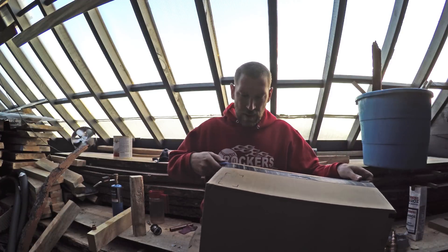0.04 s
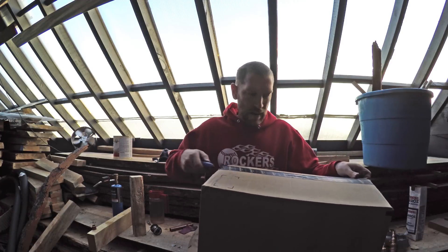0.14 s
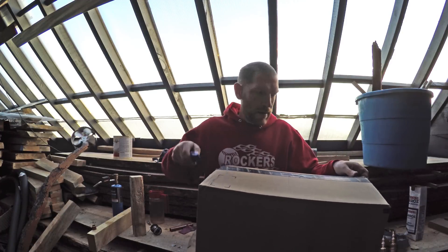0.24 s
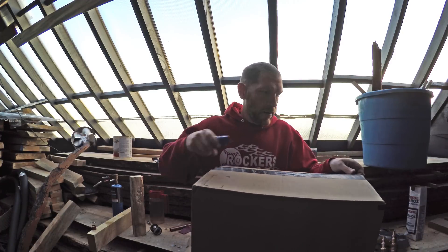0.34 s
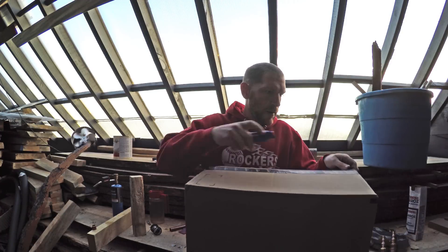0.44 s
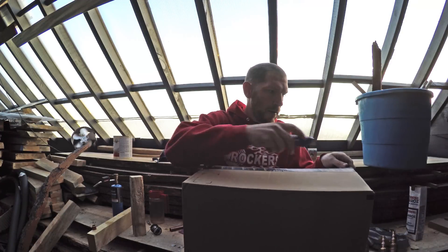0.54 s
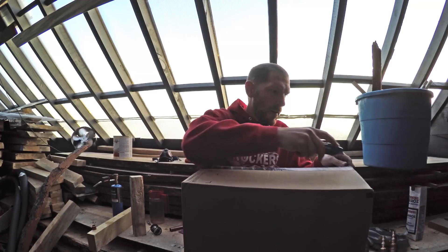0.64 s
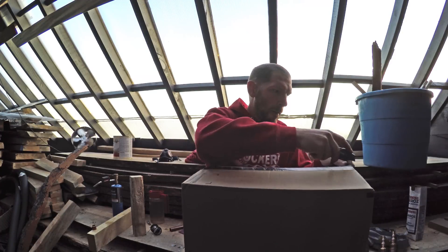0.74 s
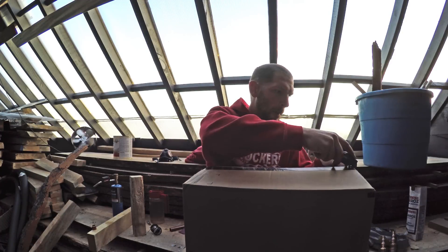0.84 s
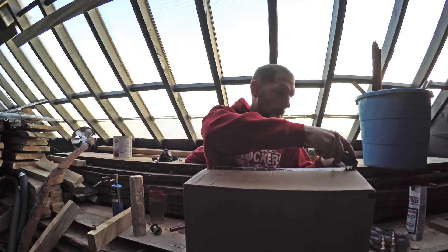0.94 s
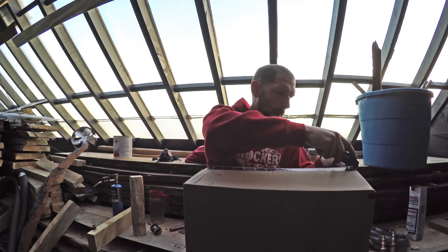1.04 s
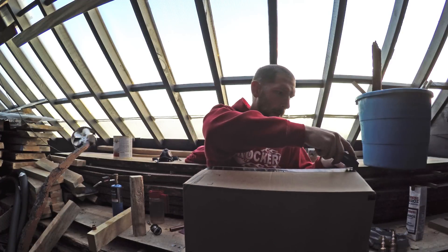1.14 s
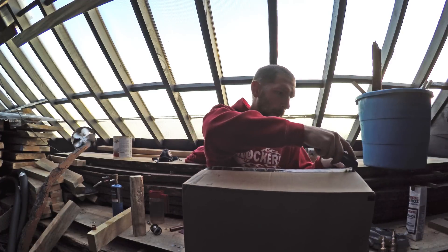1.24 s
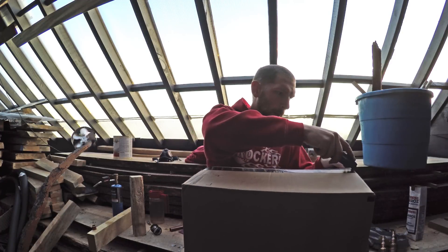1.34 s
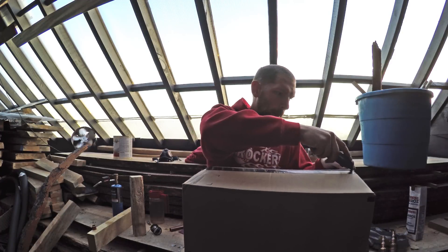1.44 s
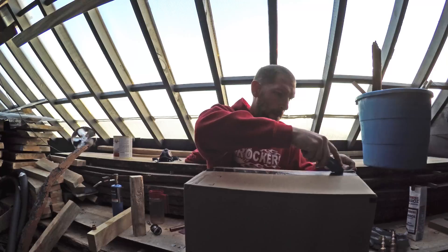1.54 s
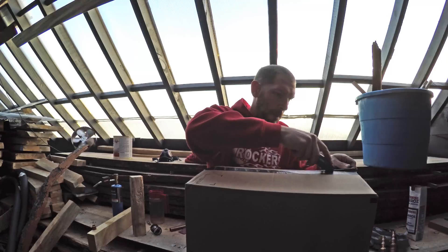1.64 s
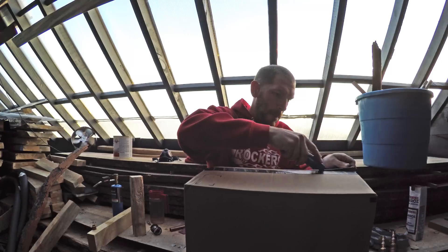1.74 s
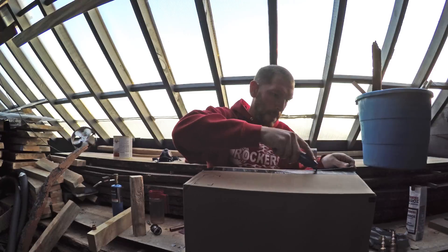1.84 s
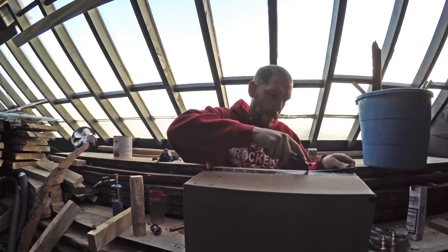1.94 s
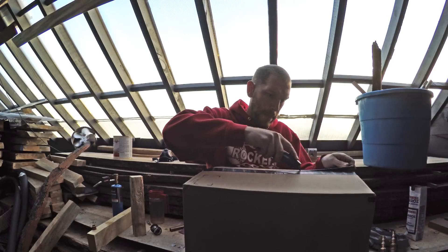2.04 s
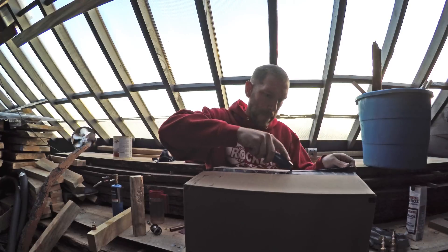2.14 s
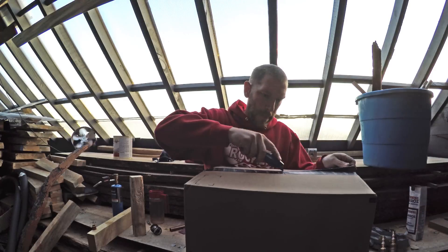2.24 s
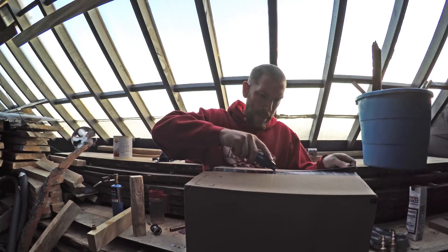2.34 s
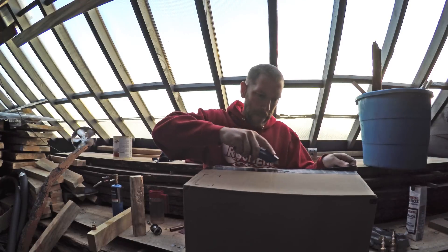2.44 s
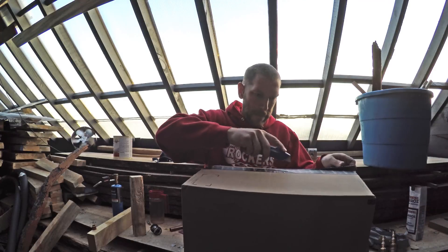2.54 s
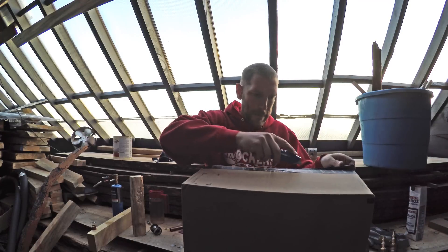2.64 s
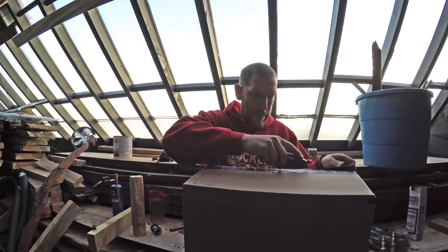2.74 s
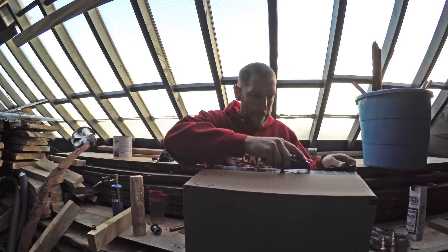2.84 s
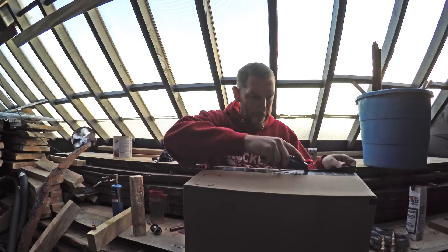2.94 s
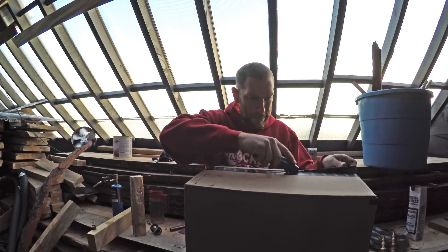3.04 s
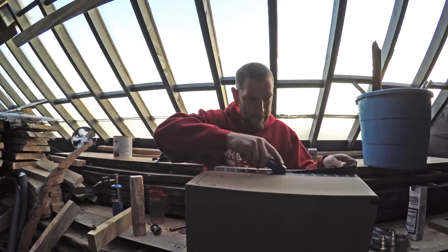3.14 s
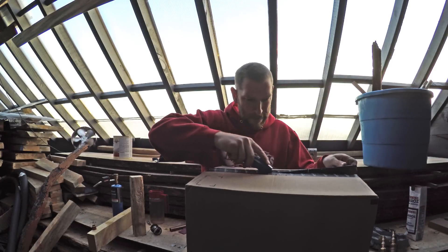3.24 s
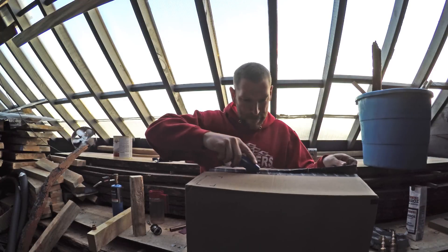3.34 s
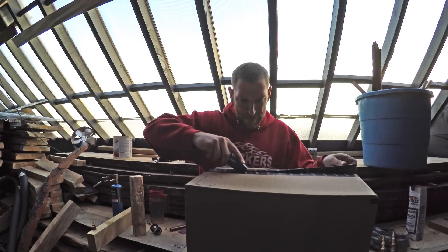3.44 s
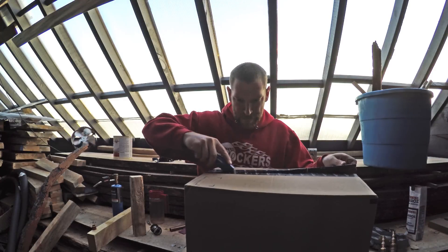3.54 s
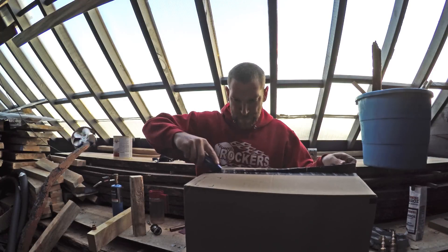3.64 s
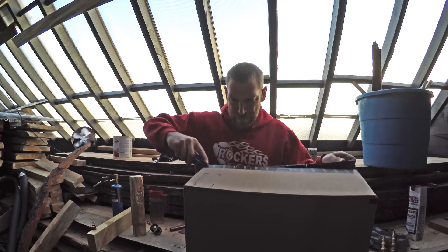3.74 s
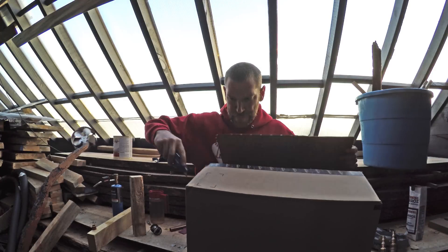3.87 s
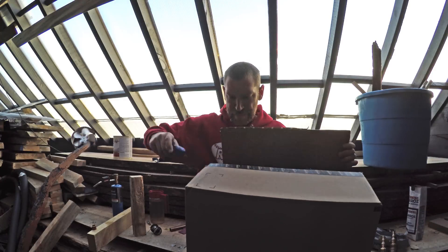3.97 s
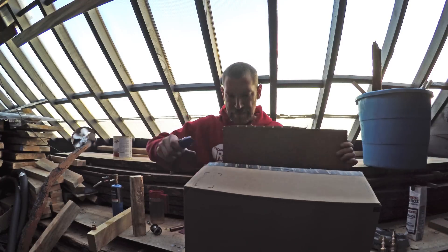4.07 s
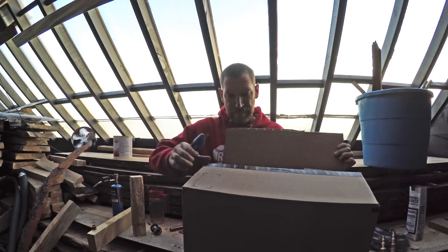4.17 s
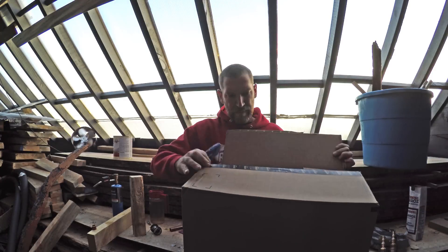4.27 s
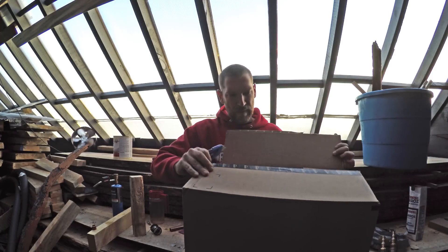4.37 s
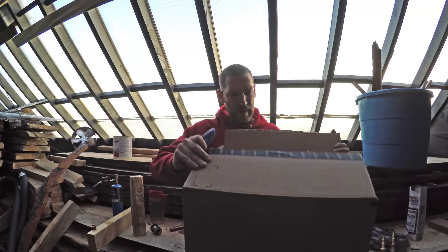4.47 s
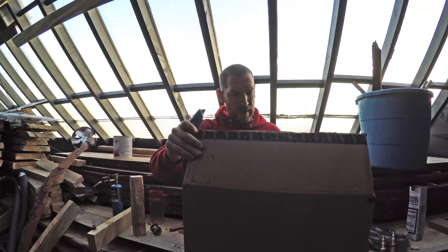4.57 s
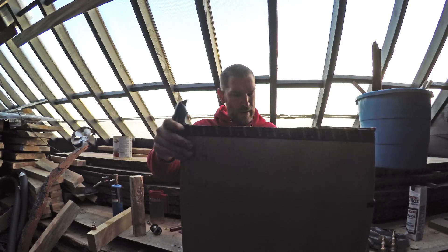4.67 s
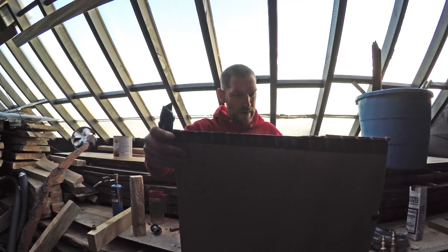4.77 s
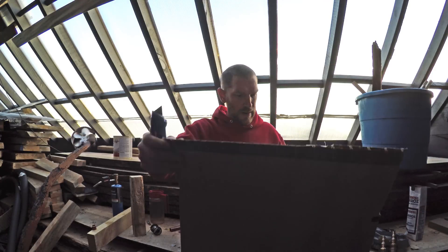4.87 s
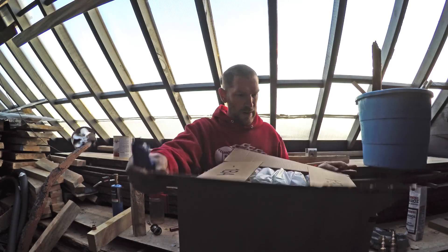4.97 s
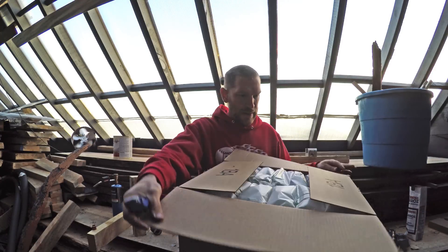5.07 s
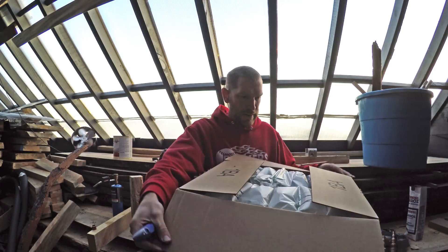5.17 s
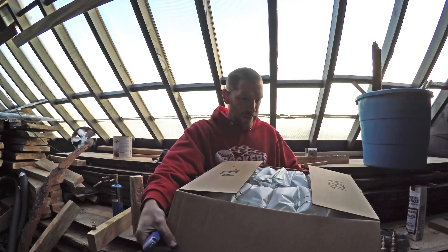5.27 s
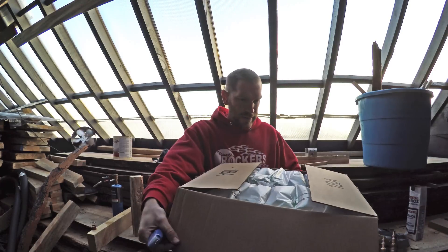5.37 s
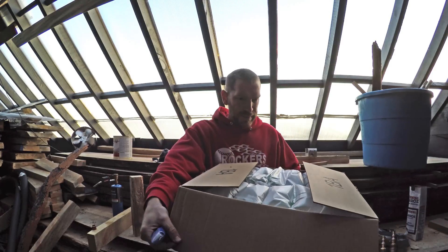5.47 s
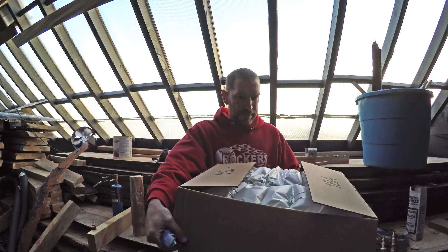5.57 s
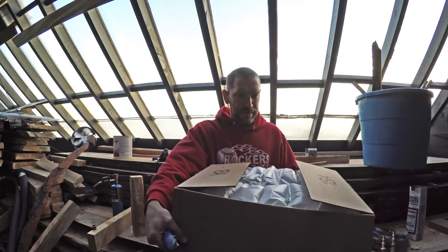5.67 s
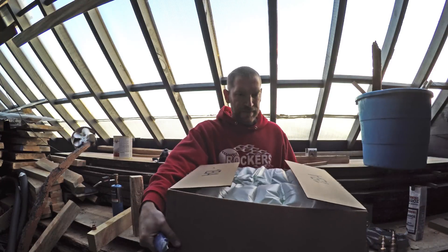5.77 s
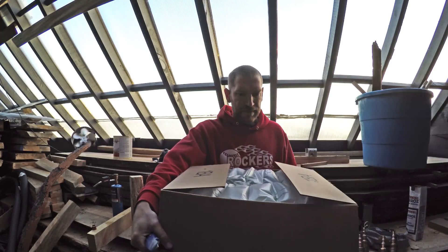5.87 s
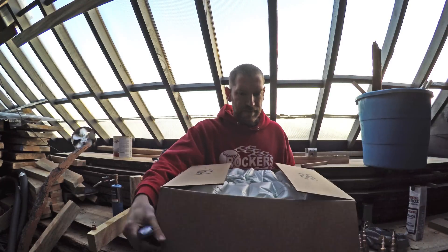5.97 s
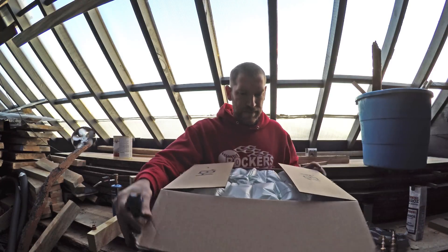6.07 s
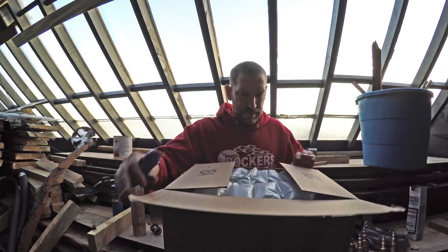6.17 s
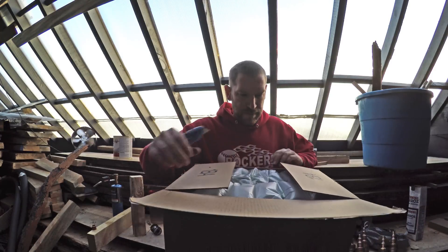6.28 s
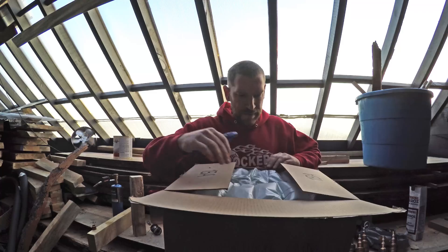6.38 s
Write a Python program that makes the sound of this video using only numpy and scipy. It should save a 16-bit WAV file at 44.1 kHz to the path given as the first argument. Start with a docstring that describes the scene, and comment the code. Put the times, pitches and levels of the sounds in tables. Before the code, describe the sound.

Two hollow bumps and a scuff on a cardboard box open the scene, followed by light metallic ticks from a utility knife between 0.9 and 1.4 seconds. At 1.5 seconds the blade pops through the packing tape with a sharp crack and thump, the loudest moment, and starts a rasping cut. From about 1.9 to 2.4 seconds it stutters rapidly over ridges in the card while the box drums and the bench booms beneath. The knife clicks at 2.5 seconds. Two more hissing, crackling cuts with hollow knocks run from 3 to 3.9 seconds. From 4.2 seconds the flaps are pulled open in three softer rubbing movements, with dull knocks, low puffs of air and a few knife ticks, fading around 6.3 seconds. Everything sounds close, with a very short shed echo and a faint, steady low rumble.

```python
"""A knife opens a taped cardboard box in an airy shed, over a low rumble. First hands bump and scuff
the hollow box, and loose steel parts of the knife tick. At 1.5 s the blade pops through the tape and cuts:
the box drums, the bench under it booms, the card rasps and hisses. Around 2 s the blade stutters over the
ridges inside the card, and from 3 s it makes two more cuts. From 4.2 s the flaps are pulled open,
pushing air and rubbing until they fall quiet at about 6.3 s."""
import sys
import numpy as np
from scipy import signal
from scipy.fft import rfft, irfft, next_fast_len
from scipy.io import wavfile
from scipy.ndimage import uniform_filter1d, map_coordinates

SR = 44100
rng = np.random.default_rng(int(sys.argv[2]) if len(sys.argv) > 2 else 0)


def generate_wav(signal):
    """Clip the signal to [-1, 1] and save it as 16-bit WAV at the path in sys.argv[1]."""
    frames = np.transpose(np.atleast_2d(signal))
    scaled = np.clip(frames, -1, 1) * 32767
    pcm = np.round(scaled).astype(np.int16)
    wavfile.write(sys.argv[1], SR, pcm)


N = 282681


def amp(db):
    """Turn decibels into a multiplier."""
    return 10 ** (np.asarray(db) / 20)


def unit(x):
    """Scale x to an average (rms) strength of 1."""
    return x / np.sqrt(np.mean(x ** 2) + 1e-20)


def along(points, hz):
    """Read between (pitch, value) points on a musical (log) scale."""
    pitches, values = np.transpose(points)
    return np.interp(np.log(hz + 1), np.log(pitches + 1), values)


def wobble(rate):
    """A smooth curve through `rate` random values a second."""
    return map_coordinates(rng.standard_normal(int(N * rate / SR) + 4), [np.arange(N) * rate / SR])


def drift(tones, t):
    """A random wander for each tone, to make it unsteady."""
    return np.cumsum(rng.standard_normal((len(tones), len(t))), axis=1)


def filtered(x, response):
    """Turn each frequency of x up or down by response(hz)."""
    size = next_fast_len(len(x) + SR // 2)
    return irfft(rfft(x, size) * response(np.fft.rfftfreq(size, 1 / SR)), size)[:len(x)]


def resonant(tones):
    """The response of an object that favours some (pitch, width, level) tones."""
    return lambda hz: sum((-1) ** k * amp(db) * 1j * hz * width / (pitch ** 2 - hz ** 2 + 1j * hz * width)
                          for k, (pitch, width, db) in enumerate(tones))


def add(track, start, sound):
    """Mix a sound in at `start` seconds."""
    part = track[max(round(start * SR), 0):][:len(sound)]
    part += sound[:len(part)]


# The background noise: (pitch [Hz], relative level [dB])
AIR_COLOUR = [(25, -2.5), (50, -3.5), (75, -7), (109, -1.5), (166, -20.5), (400, -25.5), (1400, -36.5),
              (2400, -45.5), (15600, -57.5)]
def air():
    """Far rumble and faint hiss, there all the time."""
    return amp(-39) * unit(filtered(rng.standard_normal(N), lambda hz: amp(along(AIR_COLOUR, hz))))


# Four knife cuts, then three flap pulls, each a list of (time [s], box drum [dB], surface hiss [dB])
STROKES = [
    [(1.537, -32, -20), (1.558, -21.5, -34), (1.61, -73, -38), (1.65, -42, -43), (1.7, -32, -39.5),
     (1.8, -40.5, -40.5), (1.85, -38, -53.5), (1.93, -58, -57)],
    [(1.912, -30, -48), (1.928, -31.5, -38), (2.0, -30, -37), (2.1, -35.5, -35), (2.2, -30.5, -35),
     (2.33, -25.5, -37), (2.4, -30, -40.5), (2.46, -41, -50)],
    [(3.02, -37, -51), (3.08, -31, -34), (3.15, -34.5, -41.5), (3.2, -26.5, -36.5), (3.3, -45.5, -39),
     (3.38, -35.5, -43.5), (3.5, -33.5, -40), (3.67, -40, -42)],
    [(3.63, -42, -60), (3.68, -40, -37), (3.72, -30, -35.5), (3.79, -25, -33), (3.86, -28.5, -41.5),
     (3.91, -49, -44), (3.96, -76, -65), (4.2, -67, -64)],
    [(4.3, -68, -73), (4.36, -32.5, -56), (4.45, -42, -51.5), (4.53, -53, -57.5), (4.56, -35, -59),
     (4.62, -42.5, -54), (4.7, -48, -48.5), (4.73, -47, -56.5), (4.85, -55, -56.5)],
    [(4.86, -40, -71), (4.925, -39.5, -48.5), (4.96, -38.5, -46.5), (5.02, -39.5, -54), (5.1, -45.5, -54.5),
     (5.22, -51, -55), (5.24, -54, -62)],
    [(5.23, -45, -49), (5.27, -38, -51), (5.33, -49, -46), (5.39, -32, -41), (5.45, -47.5, -49.5),
     (5.6, -44.5, -47.5), (5.66, -41.5, -46), (5.74, -47.5, -53), (5.85, -53, -49), (6.1, -44, -48),
     (6.2, -42.5, -53), (6.28, -60, -65), (6.4, -69, -95)],
]
# One row a stroke: (rasp over the mean of drum and hiss [dB], rasp growth [dB/s], boom over drum [dB],
# shine over hiss [dB], low blade tone over hiss [dB], high blade tone over hiss [dB])
STROKE_COLOURS = [(-3.5, 2, -3, -10.5, -28, -14.5), (-4.5, 14.5, -4, -52, -57, -25),
                  (-3.5, -4.5, -20, -5, -35, -20), (4.5, -41, -13, -9.5, -32, -39),
                  (-3, 2.5, -20, -6, -40, -40), (-5, 17, -12, -8.5, -40, -40),
                  (0, -1.5, -10.5, -7, -40, -40)]
# Short scuffs of hand or blade: (time [s], hold [s], drum [dB], rasp [dB], hiss [dB])
SHORT_SCUFFS = [(0.0, 0.0063, -21, -36, -44.5), (0.034, 0.034, -26, -39, -43.5),
                (0.157, 0.013, -36.5, -43, -47.5), (0.482, 0.035, -58, -61, -61),
                (0.899, .004, -51, -44.5, -68), (2.46, 0.017, -39, -50, -54), (2.866, 0.028, -40, -71, -50),
                (2.96, 0.055, -43, -64, -49), (4.192, 0.016, -27, -44, -46), (4.225, 0.015, -45, -69, -47),
                (4.556, 0.018, -61, -56, -48.5)]
# A faint rustle that never stops: (drum [dB], rasp [dB], hiss [dB], shine [dB])
RUSTLE_DB = (-67, -69.5, -66.5, -74)
def contact():
    """How hard rubbing drives drum, rasp, hiss, shine (top treble), two blade tones and boom."""
    now, gains = np.arange(N) / SR, np.zeros((7, N))
    for stroke, (rasp_over, growth, boom_over, *treble_over) in zip(STROKES, STROKE_COLOURS):
        times, *curves = np.transpose(stroke)
        on = (now > times[0]) & (now < times[-1])
        age = now[on] - times[0]
        drum_db, hiss_db = [np.interp(now[on], times, curve) for curve in curves]
        rasp_db = (drum_db + hiss_db) / 2 + rasp_over + growth * age
        treble_db = [hiss_db + db for db in treble_over]
        fade = np.clip(np.minimum(age, times[-1] - now[on]) / 0.015, 0, 1)
        gains[:, on] += fade * amp([drum_db, rasp_db, hiss_db, *treble_db, drum_db + boom_over])
    rise_s, fade_db_per_s = 0.012, 410
    for start, hold, drum_db, rasp_db, hiss_db in SHORT_SCUFFS:
        rise = np.clip((now - start) / rise_s, 0, 1)
        fade = amp(-fade_db_per_s * np.maximum(now - start - rise_s - hold, 0))
        gains[:4] += amp([[drum_db], [rasp_db], [hiss_db], [hiss_db - 7.5]]) * rise * fade
    gains[:4] += amp(RUSTLE_DB)[:, None]
    # the low blade tone swells as the blade sticks in the slit
    gains[4] += amp(-41.5) * np.exp(-((now - 3.297) / 0.081) ** 2)
    return gains


def grit(rate_hz, spread_db):
    """Friction: noise whose strength jumps from fibre to fibre."""
    return rng.standard_normal(N) * amp(spread_db * wobble(rate_hz))


def patchy(x, depth_db):
    """The contact shifts, so small patches of time and pitch swell and fade."""
    spectrum = signal.stft(x, nperseg=256)[2]
    patches = uniform_filter1d(rng.standard_normal(spectrum.shape), size=4, axis=0)
    patches = uniform_filter1d(patches, size=8, axis=1)
    return signal.istft(spectrum * amp(depth_db * unit(patches)), nperseg=256)[1][:N]


def treble(hz):
    """A weight that climbs from 0 at 4 kHz to 1 at 16 kHz."""
    return np.clip(np.log2(hz / 4000 + 1e-9) / 2, 0, 1)


# The hiss of scraped card: (pitch [Hz], relative level [dB])
CARD_COLOUR = [(710, 0.5), (1200, -2), (1620, -1), (1950, -5.5), (2400, -2), (4070, -2.5), (6000, -8.5),
               (8240, -14), (12300, -20.5), (15500, -18)]
# Broad tones of the blade held in the cut: (pitch [Hz], width [Hz], relative level [dB])
BLADE_TONES = [(7150, 750, 0), (8840, 580, -1.5), (11270, 1000, 5)]
def card(hz):
    """The colour of scraped card, lifted where the blade rings along."""
    return amp(along(CARD_COLOUR, hz)) * (1 + 0.54 * np.abs(resonant(BLADE_TONES)(hz)))


# Tones of the hollow box, its panels and the bench: (pitch [Hz], width [Hz], relative level [dB])
HOLLOW_TONES = [(94, 26, -1), (203.4, 37, 0.5), (265, 44, -0.5), (330, 29.4, -3), (417.4, 36, -7)]
PANEL_TONES = [(522, 152, 3.5), (652, 53, 11.5), (803, 106, 7.5), (1460, 240, -2.5)]
BENCH_TONES = [(42, 61, 3.5), (84.5, 11, -1)]
def rubbing():
    """Friction makes the box drum, its panels rasp, the card hiss, the blade zing and the bench boom."""
    drum_gain, rasp_gain, hiss_gain, shine_gain, *blade_gains, boom_gain = contact()
    uneven_stroke = amp(0.9 * wobble(40))
    drum = drum_gain * unit(filtered(grit(90, spread_db=2.3), resonant(HOLLOW_TONES)))
    coarse = patchy(grit(200, spread_db=2.5), depth_db=1.5)
    rasp = rasp_gain * unit(filtered(coarse, resonant(PANEL_TONES)))
    fine = patchy(grit(500, spread_db=1.0), depth_db=1.5)
    hiss = hiss_gain * unit(filtered(fine, lambda hz: card(hz) * (1 - treble(hz))))
    shine = shine_gain * unit(filtered(fine, lambda hz: card(hz) * treble(hz)))
    zing = sum(gain * unit(filtered(fine, resonant([tone])))
               for gain, tone in zip(blade_gains, BLADE_TONES[::2]))
    boom = boom_gain * unit(filtered(rng.standard_normal(N), resonant(BENCH_TONES)))
    surges = stutter()
    surface = surges * (hiss + surges ** 0.23 * shine)  # stronger surges are brighter
    scrape = drum + surges ** 0.95 * rasp + surface + surges ** 0.51 * zing
    return crackle(surges * hiss_gain) + boom + uneven_stroke * scrape


def crackle(hiss_gain):
    """Fibres snap at random under a rub; each rings briefly at its own pitch, louder with the hiss."""
    snaps_per_s, middle_hz, ring_s = 400, 2391, 0.033
    t = np.arange(SR // 25) / SR
    when, pitch, softness = rng.random((int(snaps_per_s * N / SR), 3)).T
    hz = middle_hz * 2 ** (2 * pitch - 1)  # up to an octave either way
    starts = (when * (N - 1)).astype(int)
    gain = hiss_gain[starts] * amp(-0.5 - 10 * softness)
    rings = gain[:, None] * amp(-60 * t / ring_s) * np.sin(2 * np.pi * hz[:, None] * t)
    positions = starts[:, None] + np.arange(len(t))
    return np.bincount(positions.ravel(), rings.ravel(), N + len(t))[:N]


# Tones of the box walls: (pitch [Hz], ring time [s]). A ring time is how long a 60 dB fade takes.
WALL_TONES = [(102, 0.075), (125, 0.12), (203, 0.097), (235, 0.13), (260, 0.097), (300, 0.077),
              (335, 0.017), (400, 0.056), (460, 0.027), (570, 0.094), (637, 0.033), (740, 0.075),
              (790, 0.082), (1250, 0.036)]
# Blows on the box: (time [s], level [dB], rise [ms], low pitch [Hz], high over low [dB], high pitch [Hz])
BOX_BLOWS = [(0.0, -7.5, 2.1, 246, -11, 400), (0.038, -10, 1.6, 392, -14.5, 700),
             (0.906, -36.5, 0.57, 300, -2, 1250), (1.539, 0, 4.9, 257, -3, 686),
             (1.56, -29, 1.4, 253, 10, 790), (1.952, -15.5, 5.2, 235, -6, 630),
             (2.013, -8.5, 6.6, 202, -1.5, 460), (2.048, -12.5, 4.3, 209, -16, 553),
             (2.222, -19.5, 2.1, 260, -10, 637), (2.311, -15.5, 2, 203, -4, 600),
             (2.96, -15.5, 6.3, 233, -9.5, 806), (3.052, -7.5, 4.8, 102, -3.5, 790),
             (3.078, -7, 2.7, 100, -15, 820), (3.113, -10.5, 3.6, 105, -11.5, 260),
             (3.195, -8, 5.7, 126, -2.5, 316), (3.284, -13.5, 3.2, 116, 3.5, 272),
             (3.682, -14, 7.7, 267, 0, 614), (3.782, -11, 2.1, 300, -14, 740),
             (3.861, -16, 1.6, 229, -12, 783), (4.2, -22, 0.94, 106, 0, 400),
             (4.316, -19, 5.2, 307, -23, 755), (4.567, -16, 12, 241, 1.5, 363),
             (4.9742, -14, 0.84, 460, -14, 1190), (4.981, -16.5, 0.87, 280, -2, 400),
             (5.252, -22.5, 4.1, 267, 0.5, 853), (5.364, -25.5, 2.3, 263, -1.5, 793)]
def knocks():
    """Each blow rings the wall tones near its two pitches, a little unsteadily, and rattles the panels."""
    out, rattle, t = np.zeros(N), np.zeros(N), np.arange(SR // 5) / SR
    hz, ring_s = np.transpose(WALL_TONES)[:, :, None]
    for start, db, rise_ms, low_hz, high_db, high_hz in BOX_BLOWS:
        tone_db = np.maximum(-45 * np.abs(np.log2(hz / low_hz)),
                             high_db - 60 * np.abs(np.log2(hz / high_hz)))
        waver = rng.normal(0, 0.24, hz.shape) + 0.013 * drift(hz, t)
        rise = amp(db) * (1 - np.exp(-1000 * t / rise_ms))
        tones = amp(tone_db - 60 * t / ring_s) * np.sin(2 * np.pi * hz * t + waver)
        add(out, start, rise * tones.sum(axis=0))
        add(rattle, start, rise * amp(high_db - 14.5 - 60 * t / 0.072) * rng.standard_normal(len(t)))
    return out + filtered(rattle, resonant(PANEL_TONES))


# The echo of the shed: (pitch [Hz], ring time [s])
SHED_RING = [(200, 0.12), (2000, 0.17), (12000, 0.11)]
def shed_echo(x):
    """Each pitch dies away in the room at its own speed; every quarter second gets a new random echo."""
    out, step, delay_s = np.zeros(N), SR // 4, 0.006
    for start in range(0, N, step):
        hz, t, noise = signal.stft(rng.standard_normal(SR // 2), SR, nperseg=256)
        fade = amp(-60 * t / along(SHED_RING, hz)[:, None])
        tail = signal.istft(noise * fade, SR, nperseg=256)[1]
        echo = signal.fftconvolve(x[start:start + step], tail / np.linalg.norm(tail))
        add(out, start / SR + delay_s, echo)
    return out


# Tones of the knife's steel: (pitch [Hz])
STEEL_TONES = [3580, 4220, 4420, 4790, 5240, 6540, 7100, 7720, 7900, 8800, 9380, 10800, 13200, 14100]
# Ticks of the knife: (time [s], relative level [dB], ring gain [dB], main pitch [Hz],
# second pitch [Hz], ring time at 6 kHz [s])
KNIFE_TICKS = [(0.114, -26, -28, 9400, 4500, 0.27), (0.905, -28.5, -8, 4500, 5130, 0.03),
               (0.916, -30, -13, 4500, 8000, 0.023), (0.954, -41, -11, 5100, 11300, .03),
               (1.057, -41, -4, 5170, 4660, 0.028), (1.151, -35, -9, 4800, 7160, 0.041),
               (1.193, -32, -3, 3460, 4200, 0.012), (1.225, -38, -7, 5160, 11000, 0.022),
               (1.379, -33, -2, 5100, 10900, 0.0093), (2.469, -37, -8, 3600, 6800, .02),
               (2.493, -22, -6, 3720, 7000, 0.074), (2.611, -41.5, -2.5, 3600, 5130, 0.078),
               (2.613, -42, -4.5, 6880, 9750, 0.13), (2.683, -40, -12, 5060, 7500, .05),
               (4.08, -42.5, -5, 4070, 5140, 0.13), (4.144, -37.5, -1.5, 4270, 9360, 0.21),
               (4.3054, -39, -7, 4760, 6840, 0.098), (4.778, -29, -15, 5300, 6240, 0.095),
               (4.968, -37, -2, 4130, 9300, 0.022), (6.278, -38, -11, 6800, 6200, .02)]
def ticks():
    """A loose part of the knife gives a dry snap; the steel tones near its two pitches ring on."""
    out, t, hz = np.zeros(N), np.arange(SR // 4) / SR, np.array(STEEL_TONES)[:, None]
    for start, db, ring_db, main_hz, second_hz, ring_s in KNIFE_TICKS:
        octaves_off = np.minimum(np.abs(np.log2(hz / main_hz)), np.abs(np.log2(hz / second_hz)) + 0.059)
        tone_db = ring_db + np.maximum(-70 * octaves_off, -22) + rng.normal(0, 1.5, hz.shape)
        chatter = 0.14 * drift(hz, t)  # loose parts blur the pitch and shake the level
        shake_db = 2.5 * unit(uniform_filter1d(rng.standard_normal(chatter.shape), size=150, axis=1))
        fade_db = -60 * t / ring_s * (hz / 6000) ** 0.56
        tones = amp(tone_db + fade_db + shake_db) * np.sin(2 * np.pi * hz * t + chatter)
        ring = tones.sum(axis=0) * (1 - np.exp(-t / 0.00095))
        snap = unit(filtered(rng.standard_normal(len(t)), resonant([(4500, 3300, 0)])))
        add(out, start, amp(db) * (ring + amp(-13 - 60 * t / 0.056) * snap))
    return out


# Cracks of tape and card: (time [s], relative level [dB], treble boost [dB])
TAPE_CRACKS = [(1.5357, -0.5, 2.5), (1.6645, -17.5, 1), (1.786, -15.5, -17), (2.492, -14.5, 3),
               (2.866, -22.5, 19.5), (2.948, -18, 8), (2.9581, -13, -24), (3.022, -16.5, 7),
               (3.051, -5.5, 5), (3.057, -2.5, -18), (3.083, -18, 1), (3.108, -11, 6), (3.121, -12.5, -12),
               (3.286, -21, 21), (3.729, -15.5, 19), (3.853, -16, 2), (3.862, -17.5, -8), (4.568, -23.5, 2),
               (4.738, -28, -6), (5.252, -27, 4), (5.638, -25, 15)]
def cracks():
    """Tape or card cracks with a sudden burst of surface noise."""
    out, t, ring_s = np.zeros(N), np.arange(SR // 4) / SR, 0.1
    for start, db, boost_db in TAPE_CRACKS:
        burst = unit(filtered(rng.standard_normal(len(t)), lambda hz: card(hz) * amp(boost_db * treble(hz))))
        rise = 1 - np.exp(-t / 0.00032)
        add(out, start, amp(db - 15 - 60 * t / ring_s) * burst * rise)
    return out


# Puffs of air: (time [s], level [dB], half length [s], direction [1 towards the listener, -1 away])
AIR_PUSHES = [(1.575, -25, 0.0074, 1), (4.201, -11.5, 0.0039, 1), (4.345, -21, 0.0061, 1),
              (4.912, -15.5, 0.0051, -1), (5.076, -26, 0.0063, 1), (5.537, -25, 0.0061, 1)]
def pushes():
    """A swinging panel sends out one slow pulse of pressure, with a weak opposite dip on each side."""
    out, t = np.zeros(N), np.arange(-SR // 10, SR // 10) / SR
    for time, db, half_s, direction in AIR_PUSHES:
        spread = (t / half_s) ** 2
        pulse = (1 - spread) * np.exp(-spread / 2)
        add(out, time - 0.1 + half_s, direction * amp(db) * pulse)
    return out


# The blade jumps from ridge to ridge inside the card: (time [s], strength [dB])
RIDGE_JUMPS = [(1.916, -0.5), (1.95, -2.5), (1.97, -0.5), (1.992, 3), (2.015, 3.5), (2.046, 1),
               (2.077, 1.5), (2.104, -1.5), (2.129, 0.5), (2.149, 0.5), (2.1727, 2), (2.199, 1), (2.222, 1),
               (2.245, 2.5), (2.271, 1.5), (2.289, 2.5), (2.313, 5), (2.333, -9), (2.378, -6)]
def stutter():
    """The strength of the scrape surges at each ridge and sags in the hollow behind it."""
    surges, t, now = np.zeros(N), np.arange(SR // 20) / SR, np.arange(N) / SR
    for start, db in RIDGE_JUMPS:
        add(surges, start, amp(db) * np.exp(-(t / 0.018) ** 2) * (1 - np.exp(-t / 0.0017)))
    crossing = (now > RIDGE_JUMPS[0][0]) & (now < RIDGE_JUMPS[-2][0])
    return np.where(crossing, amp(-12), 1) + surges


# Tones rung by each jump: (typical pitch [Hz], relative level [dB], ring time [s])
FLICK_TONES = [(918, -11, 0.11), (1637, -3, 0.086), (2410, -3, 0.053), (3500, -7.5, 0.089),
               (4130, -15, 0.027), (4890, -8, 0.032), (11440, -9.5, 0.026)]
def flicks():
    """Each jump taps blade and card: a dry snap, then tones whose pitch and level vary by chance."""
    out, t = np.zeros(N), np.arange(SR // 10) / SR
    hz, db, ring_s = np.transpose(FLICK_TONES)[:, :, None]
    snap_db, ring_db = -44, -35
    for start, jump_db in RIDGE_JUMPS:
        phase = 2 * np.pi * hz * rng.normal(1, 0.07, hz.shape) * t + 0.07 * drift(hz, t)
        snap = amp(snap_db + jump_db - 60 * t / 0.026) * rng.standard_normal(len(t))
        tone_db = ring_db + jump_db + db + rng.normal(0, 3.5, hz.shape)
        tones = amp(tone_db - 60 * t / ring_s) * np.sin(phase)
        add(out, start, snap + tones.sum(axis=0))
    return out


# Brief hums of a box wall: (time [s], length [s], pitch [Hz], level [dB])
WALL_HUMS = [(2.348, 0.062, 632, -26), (3.756, 0.077, 758, -29.5), (5.255, 0.05, 820, -38.5),
             (5.363, 0.05, 824, -37), (6.022, .035, 778, -47)]
def hums():
    """A dragging blade or flap keeps one wall tone going, unsteadily."""
    out, now = np.zeros(N), np.arange(N) / SR
    for start, length, hz, db in WALL_HUMS:
        rise = np.clip((now - start) / 0.0059, 0, 1)
        level_db = db - 1200 * np.maximum(now - start - length, 0) + 1.5 * wobble(50)
        out += rise * amp(level_db) * np.sin(2 * np.pi * hz * now + 0.56 * wobble(45))
    return out


def scene():
    """Mix the box and knife with their echo, the puffs of air and the background."""
    near = rubbing() + flicks() + hums() + knocks() + cracks() + ticks()
    return (near + amp(-9) * shed_echo(near) + pushes() + air())[None]


def record(dry):
    """Cut away everything above 15.2 kHz."""
    return filtered(dry[0], lambda hz: hz < 15200)[None]


dry = scene()
out = record(dry)
generate_wav(out)
```